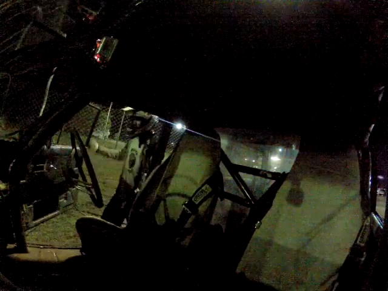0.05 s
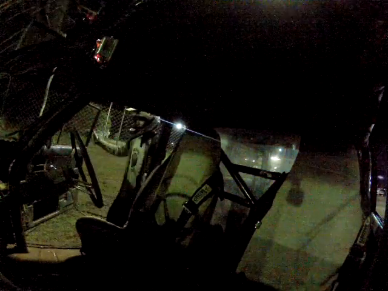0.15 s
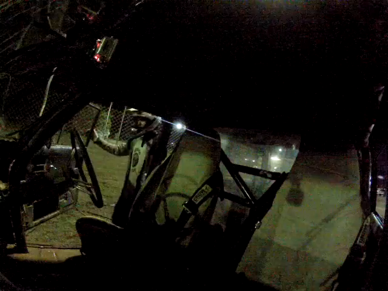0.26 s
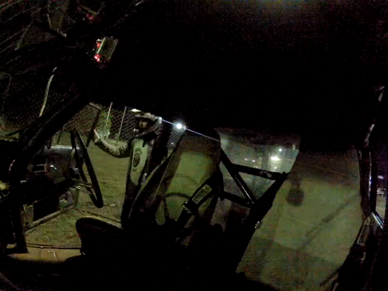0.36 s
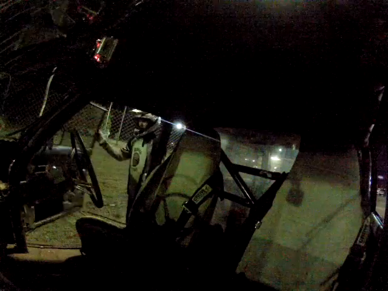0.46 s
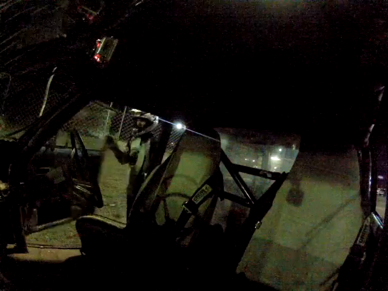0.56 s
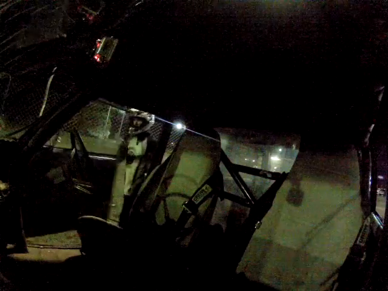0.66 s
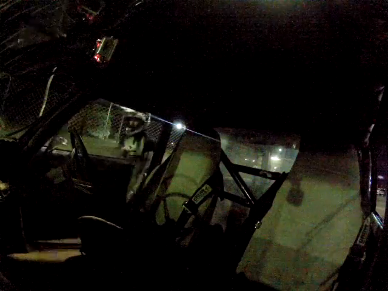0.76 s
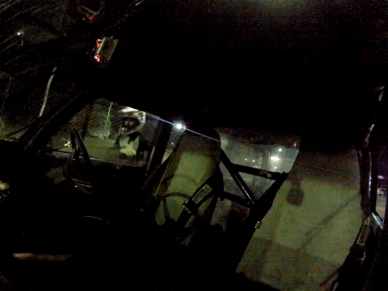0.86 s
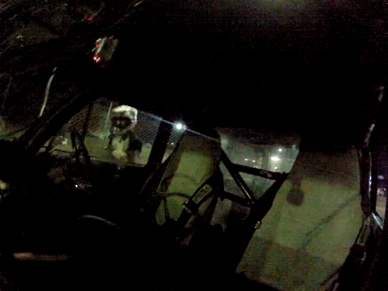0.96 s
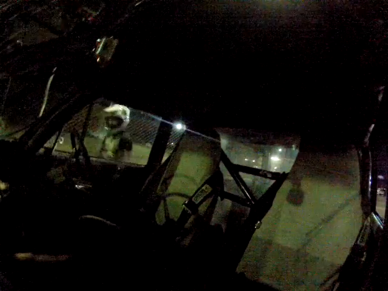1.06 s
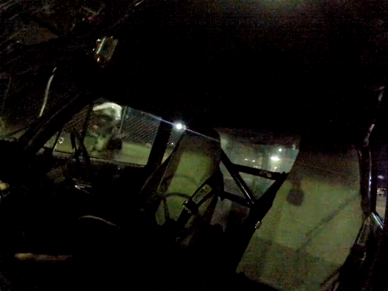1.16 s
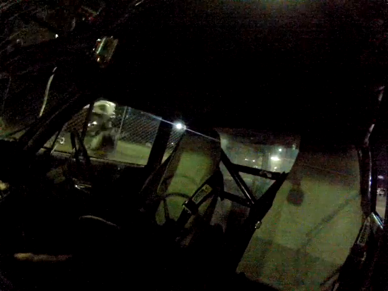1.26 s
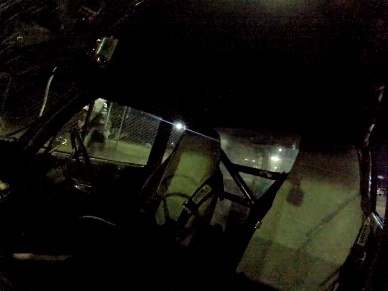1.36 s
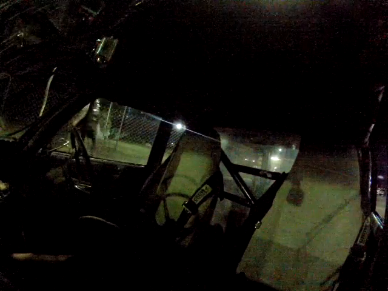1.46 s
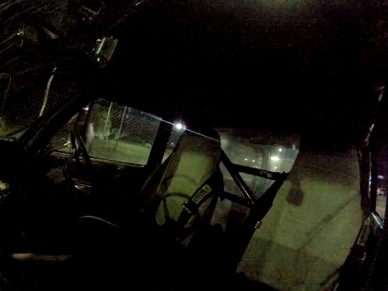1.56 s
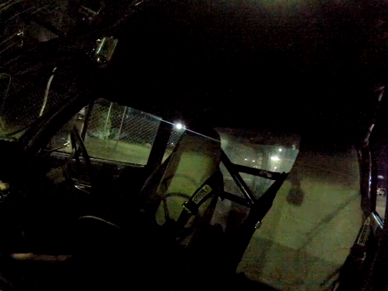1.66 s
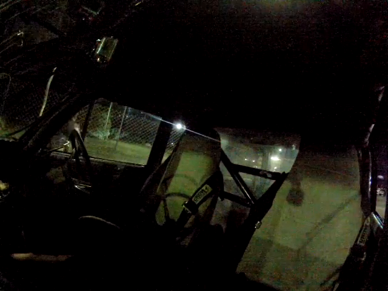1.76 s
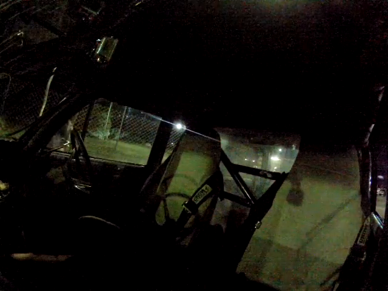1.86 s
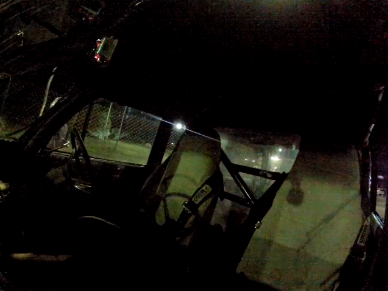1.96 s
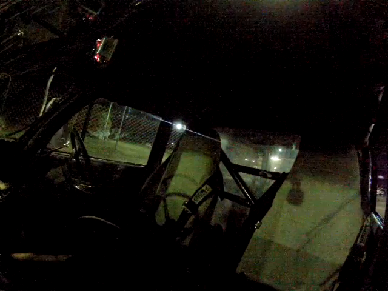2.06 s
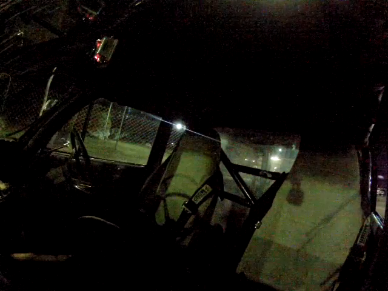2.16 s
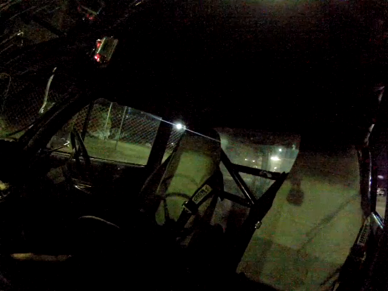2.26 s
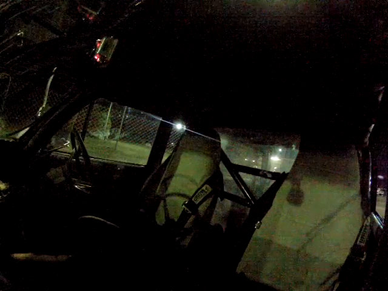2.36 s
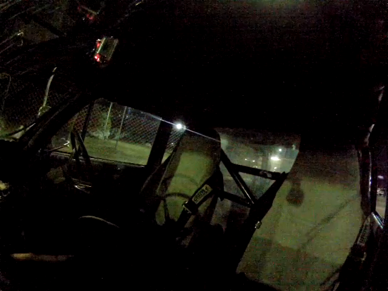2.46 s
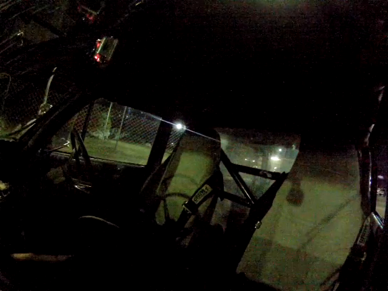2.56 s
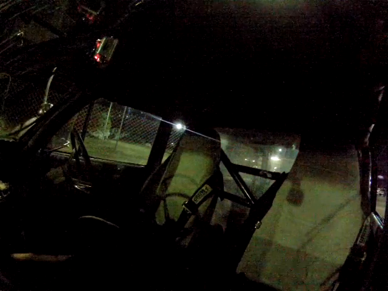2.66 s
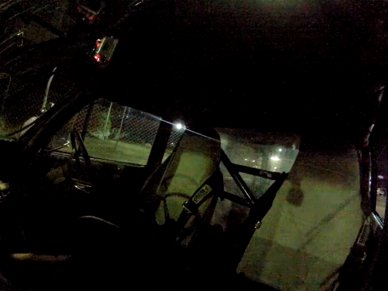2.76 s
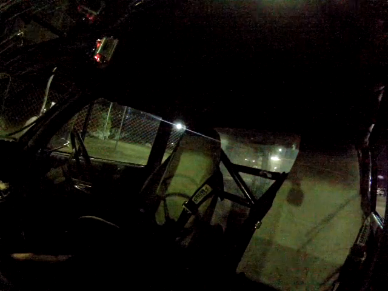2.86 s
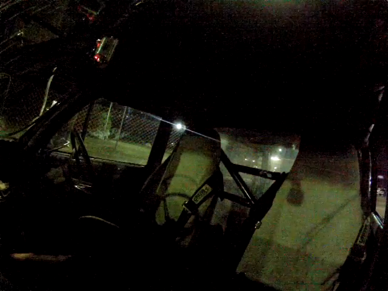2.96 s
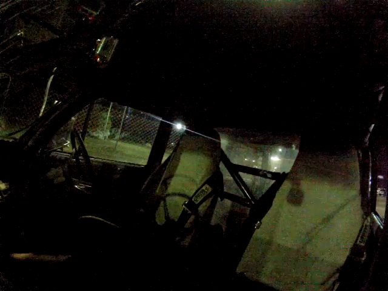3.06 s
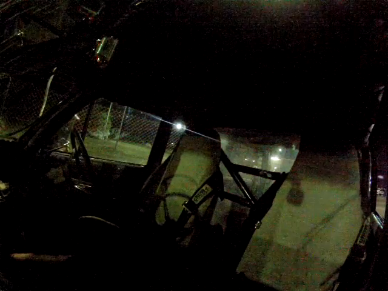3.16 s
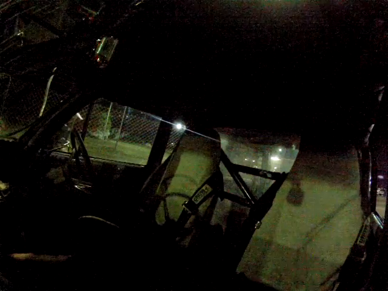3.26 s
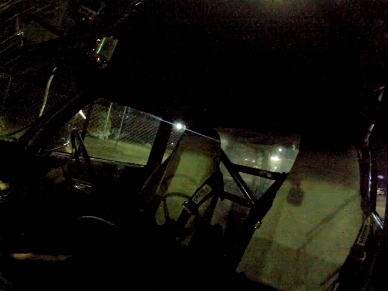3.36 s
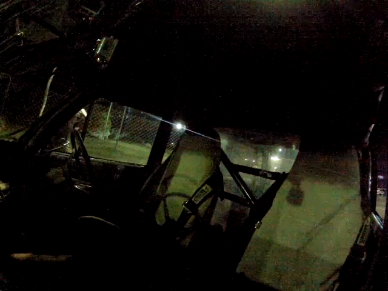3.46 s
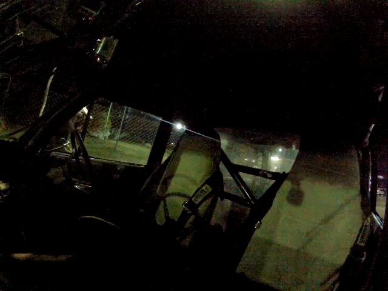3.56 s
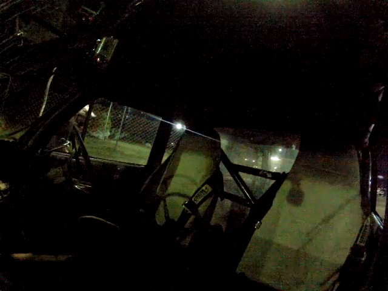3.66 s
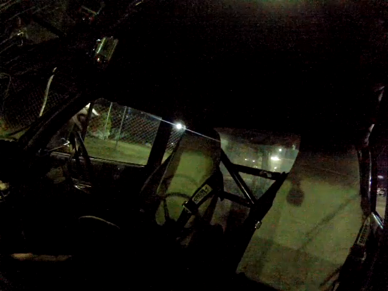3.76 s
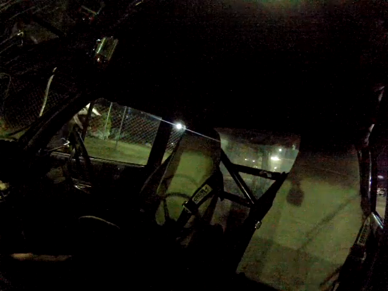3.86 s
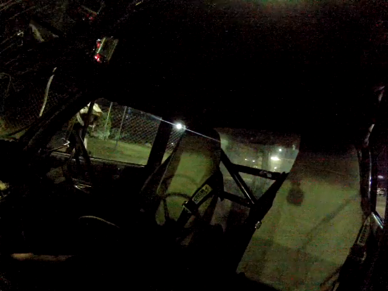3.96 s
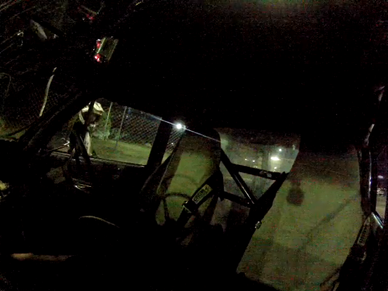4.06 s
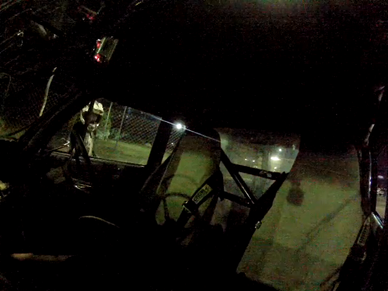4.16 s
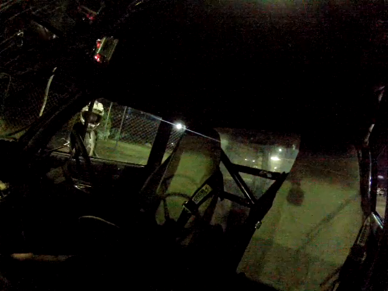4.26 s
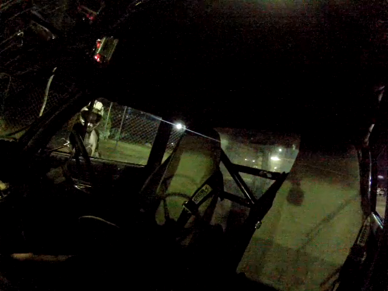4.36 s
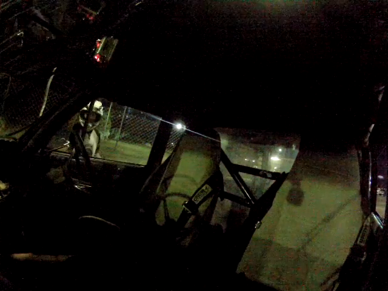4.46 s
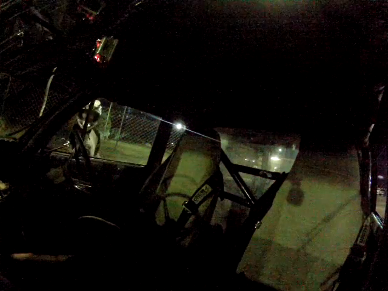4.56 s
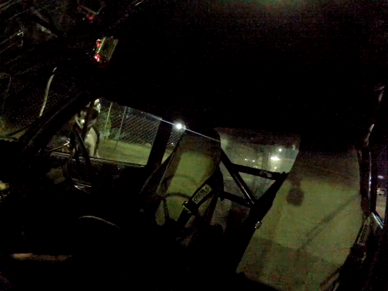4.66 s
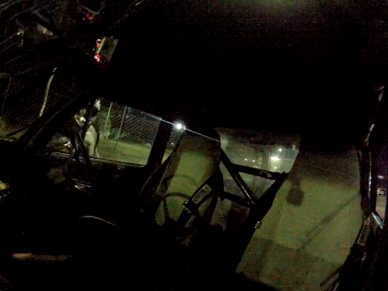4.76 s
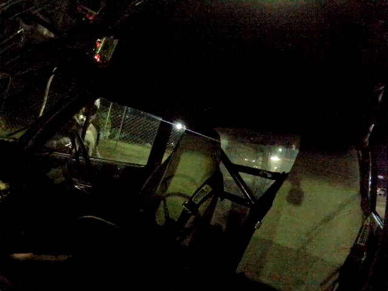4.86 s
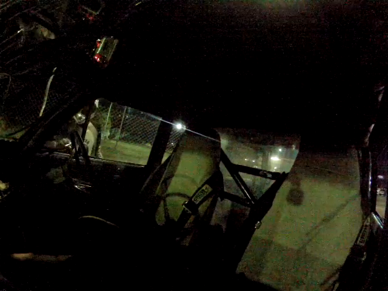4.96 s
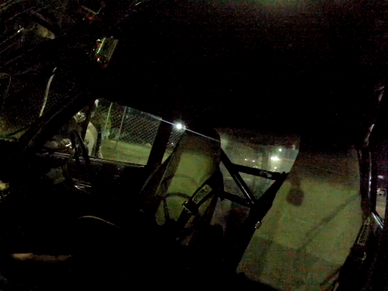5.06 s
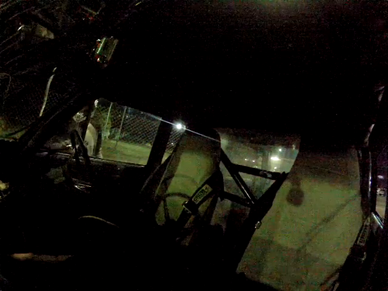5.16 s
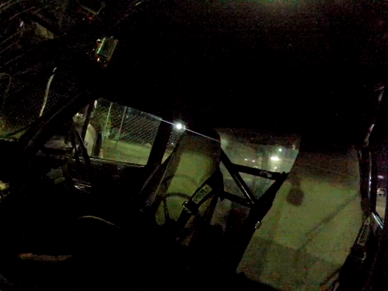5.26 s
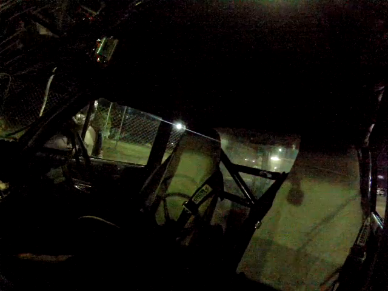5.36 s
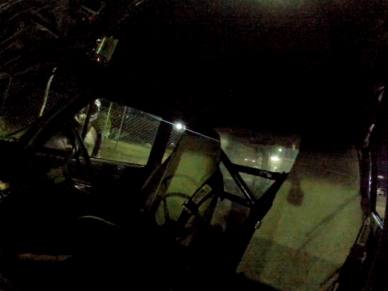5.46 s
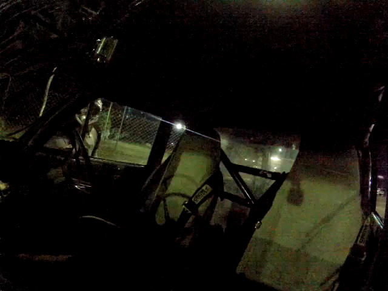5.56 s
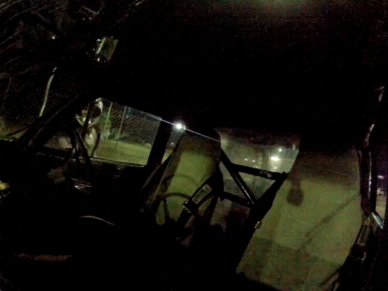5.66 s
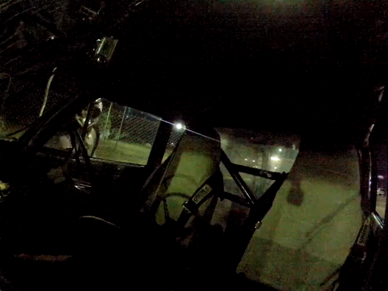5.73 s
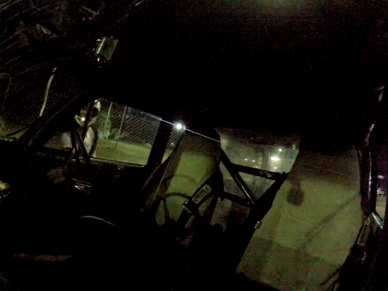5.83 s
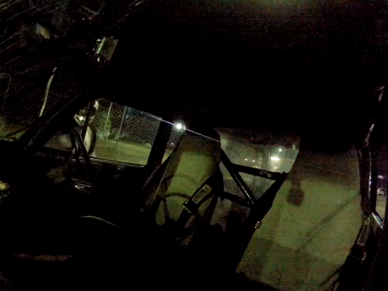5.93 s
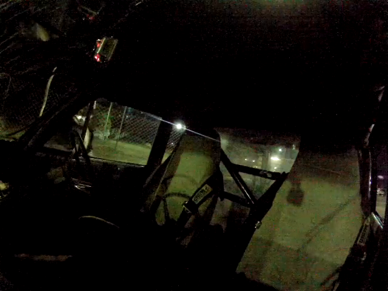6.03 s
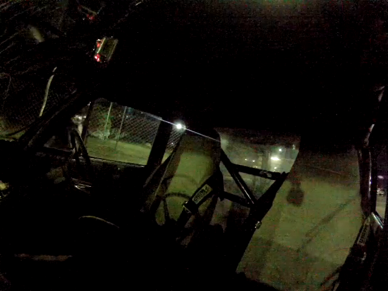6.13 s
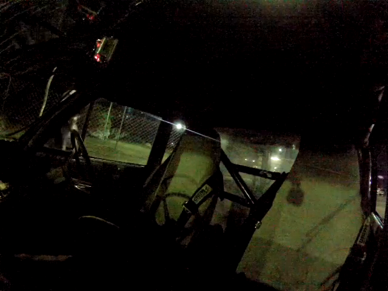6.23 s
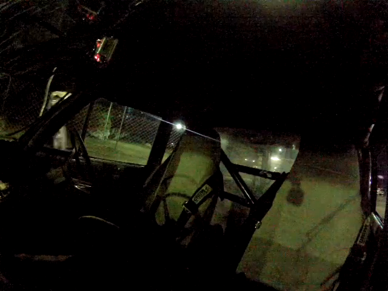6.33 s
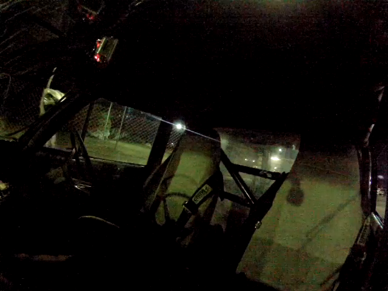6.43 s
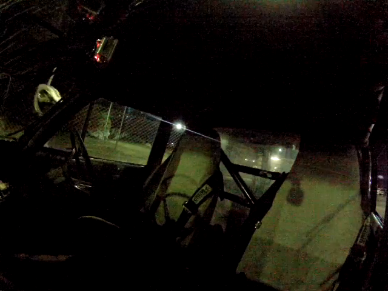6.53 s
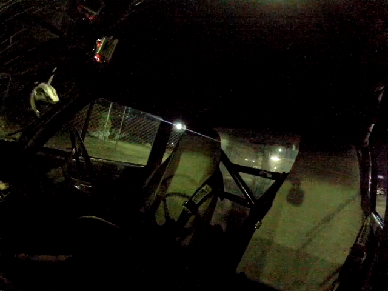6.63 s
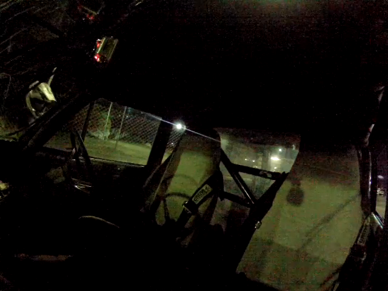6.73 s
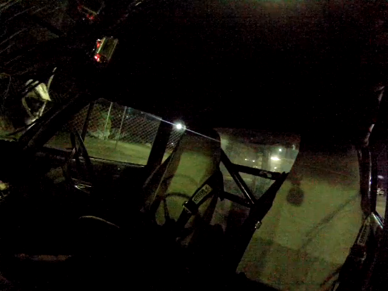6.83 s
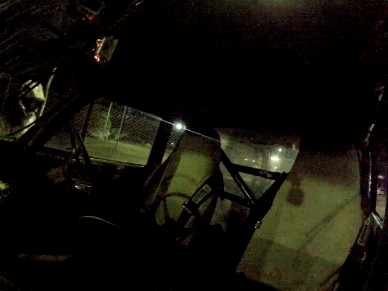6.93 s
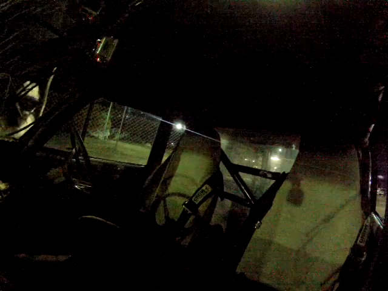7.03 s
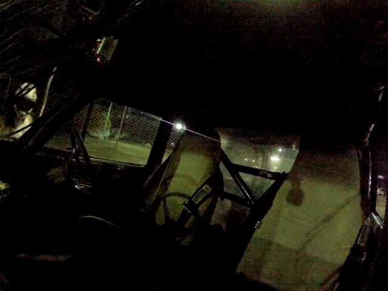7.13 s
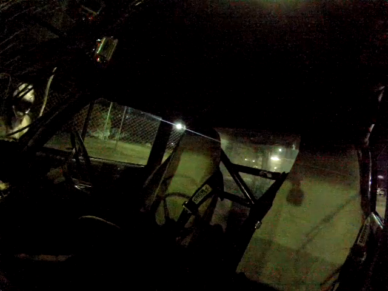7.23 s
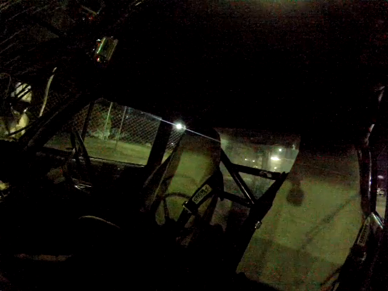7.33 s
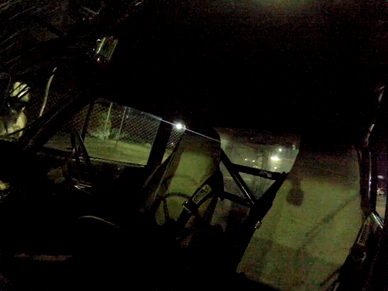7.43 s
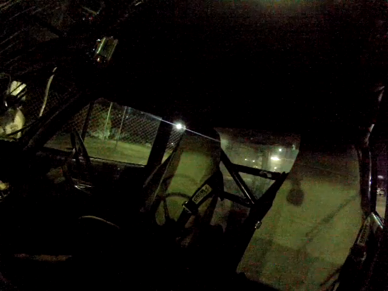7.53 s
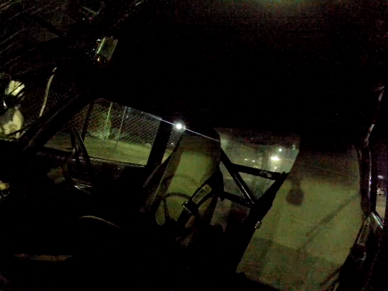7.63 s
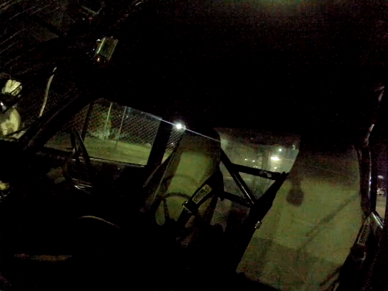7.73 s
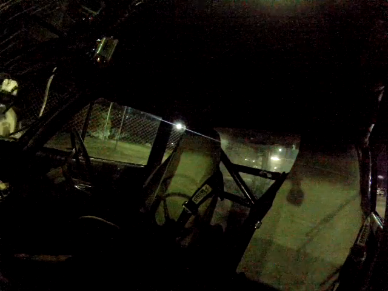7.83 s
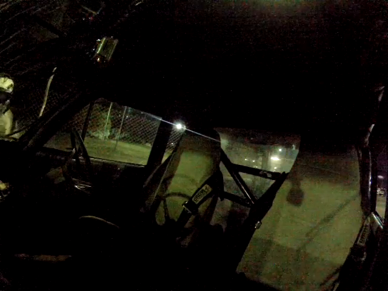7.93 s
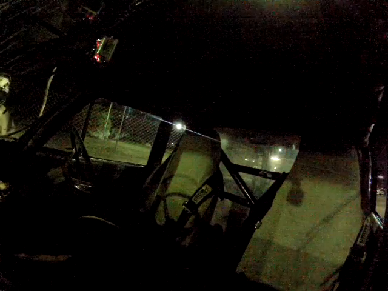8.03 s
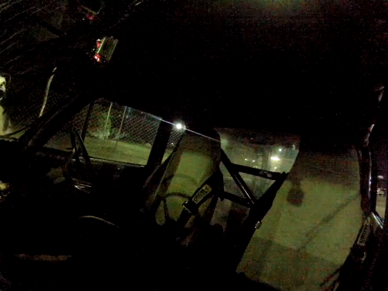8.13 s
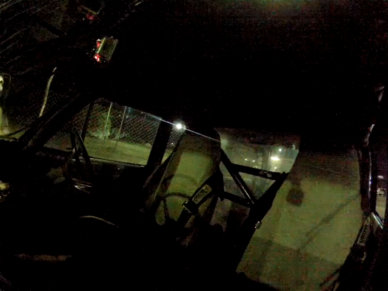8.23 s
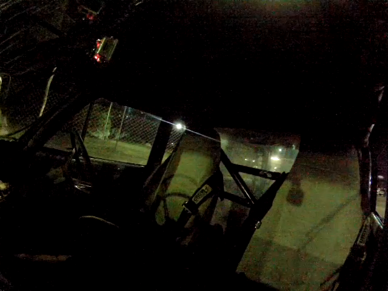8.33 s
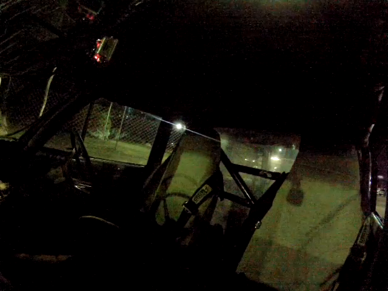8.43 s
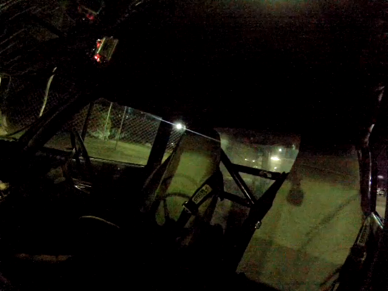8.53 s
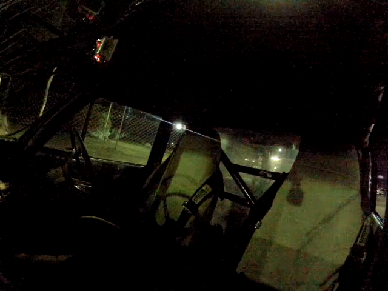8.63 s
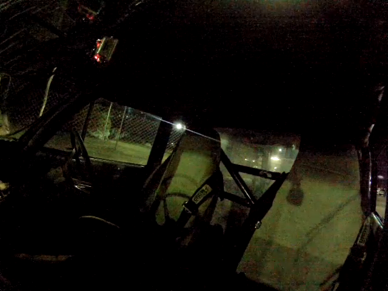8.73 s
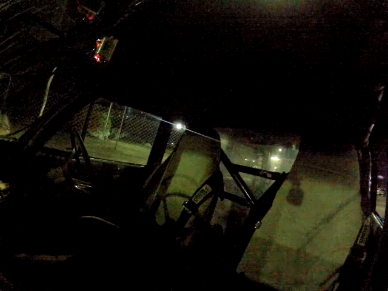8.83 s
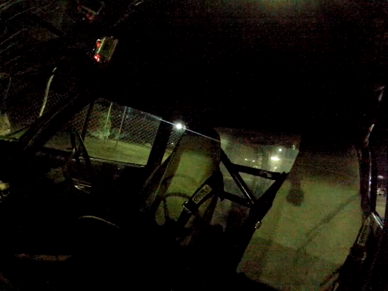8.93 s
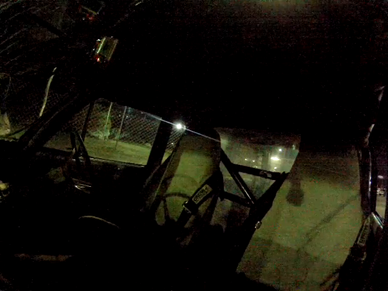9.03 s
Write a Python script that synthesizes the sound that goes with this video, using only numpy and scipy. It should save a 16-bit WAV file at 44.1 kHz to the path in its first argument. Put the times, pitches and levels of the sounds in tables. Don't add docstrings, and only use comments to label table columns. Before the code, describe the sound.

Inside a bare metal car at night, a latch clatters and the door slams with a booming crash; engines idle, rev, and drive off.

```python
import sys
import numpy as np
from scipy import signal
from scipy.fft import rfft, irfft, next_fast_len
from scipy.io import wavfile
from scipy.ndimage import uniform_filter1d

SR = 44100
rng = np.random.default_rng(int(sys.argv[2]) if len(sys.argv) > 2 else 0)


def voltage_ratio(decibels):
    exponent = np.asarray(decibels, float) / 20
    return 10 ** exponent


def transcribe(signal):
    frames = np.atleast_2d(signal).T
    limited = np.clip(frames, -1, 1)
    pcm = np.round(limited * 32767).astype(np.int16)
    wavfile.write(sys.argv[1], SR, pcm)


N = 400869
TIME = np.arange(N) / SR
IDLE_HZ = 26


def slam():
    # pitch_hz [Hz], level_db [dB], t60_s [s]
    shell = [(52.9, -19.2, 1.0), (58.1, -5, 2.4), (72.3, -10, 1.1), (84.8, -2.6, .35), (98.8, -13.3, 2.2),
             (175, -18.2, .41), (190.6, -24.2, 1.2), (251.4, -19.9, .95)]
    # start_s [s], signed force [relative], push_ms [ms]
    blows = [
        (.8699, -.89, 2.2),
        (.8736, 1.48, 14),
        (.911, -.67, 9.5),
        (.9467, -.48, 6.5),
        (.9999, -.65, 12.7),
        (1.0916, -.25, 6.9),
        (1.139, .63, 13.6),
        (1.164, -.68, 13.2),
    ]
    # pitch_hz [Hz], level_db [dB], t60_s [s]
    panels = [(164, -5, 0.68), (222, -4, 1.05), (233.7, -2.5, 0.49), (265.5, -7, 0.8), (335, -12, 0.26),
              (358, -11.5, 0.4), (408, -8, 0.13), (436, -12.5, 0.33), (513, -16.5, 0.4), (616, -24.5, 0)]
    # start_s [s], level_db [dB], thump_db [dB]
    knocks = [(.512, -34.5, -36), (.545, -35, -46), (0.871, -20.5, -60), (.918, -14, -60),
              (0.955, -23, -69), (1.001, -19, -54), (1.04, -28.5, -56), (1.1, -30, -51), (1.2, -45, -43),
              (5.285, -46, -29), (5.852, -53, -51), (8.871, -47, -52)]
    boom = ring(pushes(blows), shell)
    panel_ring = ring(pushes([(s, voltage_ratio(db), 1.2) for s, db, _ in knocks]), panels)
    thump_force = pushes([(s, voltage_ratio(thump_db), 8) for s, _, thump_db in knocks])
    thump = ring(thump_force, [(62.3, 11, 0.13), (72, 5.6, 0.12)])
    settle_s, settle_hz, settle_db, settle_db_per_s = 1.19, 66.9, -21, 21.5
    sway = np.sqrt(2) * np.sin(2 * np.pi * settle_hz * (TIME - settle_s))
    return boom + panel_ring + thump + voltage_ratio(settle_db) * swell(settle_s, .03, settle_db_per_s) * sway


def clicks():
    # pitch_hz [Hz], level_db [dB], t60_s [s]
    skin = [(1016, 0, 0.19), (1288, -5.5, 0.068), (1390, -7.5, .07), (1700, 7, .05), (2100, -13, .07),
            (2170, -10, 0.037), (2220, -11, .09), (2620, -24, 0.18), (2860, 0.5, 0.074), (3870, -11, .08),
            (4062, 1.5, 0.11), (4930, -17, 0.14)]
    # start_s [s], grit_db [dB], tilt_db [dB per band], t60_s [s], ring_db [dB]
    latch_and_crash = [(0.113, -37, -5, 0.1, -40), (0.335, -45, 1, 0.11, -42),
                       (0.381, -51.5, -21, 0.33, -63), (0.426, -53.5, -12, 0.18, -54),
                       (0.513, -29, -5, 0.097, -37), (0.623, -48, -7.5, 0.11, -46.5),
                       (0.715, -51.5, -24.5, 0.38, -66), (0.807, -58, -10, 0.11, -58),
                       (0.83, -43.5, -34, 0.51, -47), (0.864, -26, 1, 0.13, -28),
                       (0.881, -29.5, 2.5, 0.37, -30), (0.948, -26.5, 1.5, 0.2, -32),
                       (0.987, -46, -17, 0.085, -31), (1.039, -52, -6, 0.52, -45.5),
                       (1.093, -38, -3, 0.15, -30), (1.179, -53.5, -2.5, 0.082, -46),
                       (1.109, -46, -8, 0.098, -38.5), (1.236, -54.5, -8, 0.15, -51)]
    # start_s [s], grit_db [dB], tilt_db [dB per band],
    # t60_s [s], ring_db [dB]
    ticks = [
        (1.319, -55, -12, .1, -64),
        (1.4925, -41, -10, .05, -52),
        (1.540, -46, -10, .05, -56),
        (1.74, -57, -12, .15, -62),
        (4.609, -46, -9, .09, -58),
        (5.272, -53, -18, .22, -75),
        (5.849, -55, -1, .075, -54),
        (8.867, -54, -9, .15, -64),
    ]
    # pitch_hz [Hz], level_db [dB per Hz]
    crash = [(180, -17), (300, 11.5), (502, -8), (661, -18.5), (712, -18.5), (1270, -16.5), (1590, -19.5),
             (2020, -8.5), (3630, -15.5), (4220, -14), (6000, -13), (7800, -49), (13200, -120)]
    grit = colour(rng.standard_normal(N) * voltage_ratio(2.0 * walk(300)), crash)
    bands = []
    for edges in [(650, 1400), (1700, 3000), (3000, 5400)]:
        band = signal.sosfilt(signal.butter(2, edges, "band", fs=SR, output="sos"), grit)
        bands.append(band / np.std(band))
    bands = np.array(bands) * np.c_[[1, -1, 1]]
    band_number = np.c_[[0, 1, 2]]
    middle_db = np.c_[[0, 1, 0]]
    fall_rate = np.c_[[.8, 1, 1.3]]
    out, shake = np.zeros(N), np.zeros(N)
    for s, db, tilt_db, t60, ring_db in latch_and_crash + ticks:
        i = int((s - .003) * SR)
        t = TIME[:min(N - i, SR // 2)]
        now = slice(i, i + len(t))
        fall_db = -60 * t / np.clip(t60, .03, .6)
        rise = 1 - np.exp(-t / .0035)
        gain = voltage_ratio(db + tilt_db * band_number + middle_db + fall_rate * fall_db)
        out[now] += rise * np.sum(gain * bands[:, now], axis=0)
        shake[now] += rise * voltage_ratio(ring_db - 32.5 + 2.3 * fall_db)
    return out + ring(shake * rng.standard_normal(N), skin)


def blips():
    # pitch_hz [Hz], level_db [dB per Hz]
    roar_colour = [(240, -33), (400, -23), (433, -7.5), (622, -36), (721, -5), (884, -8.5), (968, -2.5),
                   (1440, -18.5), (1690, -21.5), (1950, -10.5), (2560, -13.5), (2870, -9), (3330, -13.5),
                   (4320, -16), (6000, -18), (7800, -54), (13200, -120)]
    hz, loud, opened = throttle()
    shut_share_db, open_share_db = -8.5, -8.5
    share_db = shut_share_db + (open_share_db - shut_share_db) * opened
    cycle, roar = engine(hz, roar_colour, share_db, firing_db=3, wobble=0.00195)

    hum = tones(cycle, [(2.7, 10), (4, 3.5), (5, 3), (7, -1), (8, -5), (11, -19)])
    gate = np.interp(TIME, [2.05, 2.1, 5.3, 5.4], [0, 1, 1, 0])
    hum_db = -62 + 0.62 * (hz - IDLE_HZ)

    whine = tones(cycle, [(17, -10), (22, -6), (25, -1), (28, -3)])
    gaining = np.clip(np.gradient(hz) * SR / 30, 0, 1)
    pull = gaining * np.clip((hz - 27.5) / 3, 0, 1)
    return voltage_ratio(3.0) * loud * roar + gate * voltage_ratio(hum_db) * hum + voltage_ratio(-61) * pull * whine


def throttle():
    # opens_s [s], shuts_s [s], top_hz [cycles per s], roar_db [dB]
    presses = [
        (2.241, 2.418, 28, -59),
        (2.537, 2.8, 30.5, -57),
        (3.062, 3.72, 42.5, -52.5),
        (4.449, 4.94, 37, -52.5),
    ]
    open_s, build_db, sag_hz_per_s = 0.069, 5.5, 21
    shut_s, shut_db, coast_db_per_s = 0.038, 10, 17.5
    hz, loud, opened = np.full(N, 1. * IDLE_HZ), np.zeros(N), np.zeros(N)
    for opens, shuts, top_hz, db in presses:
        u = np.clip((TIME - opens) / (shuts - opens), 0, 1)
        after = np.maximum(TIME - shuts, 0)
        wound_up = u * u * (3 - 2 * u)
        hz = np.maximum(hz, IDLE_HZ + (top_hz - IDLE_HZ) * wound_up - sag_hz_per_s * after)
        start = np.clip((TIME - opens) / open_s, 0, 1)
        drop = np.minimum(after / shut_s, 1)
        loud += start * voltage_ratio(db - build_db * (1.5 - u) - shut_db * drop - coast_db_per_s * after)
        opened += start * (1 - drop)
    return hz, loud, opened


def leaving():
    # start_s [s], firing_hz [Hz], level_db [dB]
    far_note = [
        (6.1, 138, -60),
        (6.3, 152, -50),
        (6.6, 203, -47),
        (6.9, 222, -52),
        (7.33, 251, -52),
        (7.87, 278, -50),
        (8.0, 271, -51),
        (8.38, 286, -50),
        (8.46, 287, -70),
    ]
    # multiple [ratio], level_db [dB]
    orders = [(2, 0), (2.35, -16), (3, -15), (3.45, -15)]
    # pitch_hz [Hz], level_db [dB per Hz]
    rush_colour = [(240, -27), (400, -3.5), (537, -3), (595, -11), (855, -6), (1100, -0.5), (1200, -7),
                   (1610, -8), (1950, -1), (2340, 0), (2560, -8), (2810, -2), (3370, -10), (3770, -9),
                   (6000, -16.5), (7800, -58), (13200, -120)]
    # start_s [s], rush_db [dB]
    driving = [
        (6.09, -70.5),
        (6.17, -80),
        (6.182, -67),
        (6.41, -61),
        (6.75, -54),
        (7.4, -53.5),
        (7.85, -58.5),
        (8.3, -54.5),
        (8.8, -54),
    ]
    # [repeating share, dB]
    driving_speed = [
        (5.9, 32, -9),
        (6.3, 33.5, -4),
        (6.9, 39, -6),
        (7.75, 44, -6),
        (8.0, 36.2, -3),
        (8.45, 38.4, -1),
        (8.8, 40.1, -1),
        (9.09, 39.4, -1),
    ]
    # start_s [s], added_db [dB relative to the rush], fall_db [dB per s]
    bites = [
        (6.092, 4, 60),
        (6.125, 4, 150),
        (6.179, 4, 150),
    ]

    gate, hz, first_db = curve(far_note)
    upper_db = first_db - 11 - .25 * np.maximum(235 - hz, 0)
    turn = np.cumsum(hz * (1 + .002 * walk(30))) / SR
    note = gate * (voltage_ratio(first_db) * tones(turn, [(1, 0)]) + voltage_ratio(upper_db) * tones(turn, orders))

    _, rush_db = curve(driving)
    _, hz, share_db = curve(driving_speed)
    cycle, rush = engine(hz, rush_colour, share_db, firing_db=7, wobble=.0005)
    _, tyres = engine(hz, rush_colour, -9, firing_db=3, wobble=.002)
    below = signal.butter(2, 1450, fs=SR, output="sos")
    high = rush - signal.sosfiltfilt(below, rush)
    high = high + swell(8.15, .3, 0) * singing(cycle)
    high = high * (1 + sum(voltage_ratio(db) * swell(s, .003, fall_db) for s, db, fall_db in bites))
    low = signal.sosfiltfilt(below, tyres)
    return note + swell(driving[0][0], 0.0051, 0) * voltage_ratio(rush_db + 2.0) * (high + voltage_ratio(-0.5) * low)


def singing(cycle):
    # pitch_hz [Hz], width_hz [Hz], level_db [dB relative to the rush]
    gear_peaks = [(1930, 110, -20), (2320, 110, -11), (2780, 90, -18), (3020, 70, -17), (3880, 90, -22)]
    comb = tones(cycle, [(k, 0) for k in range(44, 104, 2)])
    out = np.zeros(N)
    for hz, width, db in gear_peaks:
        peak = signal.iirpeak(hz, hz / width, fs=SR)
        out += voltage_ratio(db + 3 + 2.2 * walk(7)) * signal.filtfilt(*peak, comb)
    return out


def rumble():
    # pitch_hz [Hz], level_db [dB per Hz]
    boom_colour = [(12, -70), (20, -33), (24, -31.5), (30, -37), (49, 0.5), (65, 5.5), (80, -11),
                   (108, 3.5), (119, -8), (140, -12), (180, -23), (310, -120)]
    # pitch_hz [Hz], level_db [dB per Hz]
    drone_colour = [(65, -25), (110, -4), (157, -10.5), (172, -21), (209, -11), (237, -20), (276, -13),
                    (313, -22), (486, -45), (590, -34.5), (700, -39), (910, -67), (1540, -120)]
    # start_s [s], level_db [dB]
    idling = [(0.0, -40.5), (0.2, -33.5), (0.76, -35.5), (2.0, -34.5), (2.3, -37.5), (2.8, -34),
              (3.0, -37.5), (3.4, -34.5), (4.2, -42), (4.7, -37.5), (5.3, -36), (6.1, -41.5), (6.5, -38),
              (6.95, -41.5), (7.3, -38.5), (8.5, -41.5), (9.09, -46.5)]
    # peak_s [s], length_s [s], swell_db [dB]
    revs = [
        (3.402, .35, 6),
        (4.699, 0.23, 7),
        (6.503, 0.11, 7),
        (7.307, 0.39, 5),
        (8.488, 0.55, 11.5),
    ]
    # peak_s [s], level_db [dB], fall_db [dB per s]
    shudder = [
        (0.949, -15.5, 55),
        (1.03, -21.5, 56),
    ]
    boom_shake, drone_shake = [voltage_ratio(db) * swell(s, .07, fall_db) for s, db, fall_db in shudder]
    revs_db = sum(db * np.exp(-((TIME - s) / length) ** 2 * 2) for s, length, db in revs)
    boom = colour(rng.standard_normal(N), boom_colour)
    drone = restless(drone_colour, 1.67, 6.9)
    _, idling_db = curve(idling)
    return (voltage_ratio(idling_db) + boom_shake) * boom + (voltage_ratio(-47.5 + revs_db) + drone_shake) * drone


def night_air():
    # pitch_hz [Hz], level_db [dB per Hz]
    night = [(240, -15), (400, 1), (549, -3), (581, -21), (651, -4.5), (990, -6.5), (1020, -5),
             (1110, -7.5), (1460, -13), (1930, -8.5), (2560, -11.5), (2970, -12), (3220, -13), (4370, -15),
             (6000, -20), (7800, -61), (13200, -120)]
    return voltage_ratio(-63.5) * restless(night, 1.0, 13)


def cabin(x):
    # pitch_hz [Hz], width_hz [Hz], lift_db [dB]
    case = [(988, 24, 5), (1119, 13, 7.5), (1943, 64, 7.5), (2306, 14, 5.5), (2770, 26, 6.5), (2937, 20, 8),
            (4270, 27, 4.5)]
    out = x
    for hz, width, db in case:
        out = out + (voltage_ratio(db) - 1) * signal.lfilter(*signal.iirpeak(hz, hz / width, fs=SR), x)
    return out


def engine(hz, spectrum, share_db, firing_db, wobble):
    cycle = np.cumsum(hz * (1 + wobble * walk(20))) / SR
    place = np.arange(512) / 512
    puffs = rfft(np.exp(-(4 * place % 1) / 0.88) * rng.standard_normal(512))
    order = np.arange(len(puffs))
    order_db = firing_db * ((order % 2 == 0) / 2 + (order % 4 == 0) / 2)
    order_db = order_db + 2.0 * rng.standard_normal(len(order))
    pattern = irfft(puffs / abs(puffs) * voltage_ratio(order_db))
    firing = colour(np.interp(cycle % 1, place, pattern, period=1), spectrum)
    gas = (1 + 0.084 * np.cos(8 * np.pi * cycle)) * restless(spectrum, 0.7, 16)
    share = np.clip(voltage_ratio(share_db), 0, 1)
    return cycle, share * firing + np.sqrt(1 - share ** 2) * gas


def tones(cycle, orders):
    out = np.zeros(N)
    for k, db in orders:
        out += voltage_ratio(db + 1.8 * walk(8)) * np.sqrt(2) * np.sin(2 * np.pi * k * cycle)
    return out


def pushes(rows):
    force = np.zeros(N)
    for s, size, ms in rows:
        push = np.hanning(int(ms * SR / 1000) + 2)
        i = int(s * SR)
        force[i:i + len(push)] += size * push / push.sum()
    return force


def ring(x, modes):
    out = np.zeros(N)
    for hz, db, t60 in modes:
        pole = np.exp((2j * np.pi * hz - np.log(1000) / np.maximum(t60, 1e-9)) / SR)
        out += voltage_ratio(db) * signal.lfilter([1], [1, -pole], x).imag
    return out


def swell(s, rise_s, fall_db):
    rise = np.clip(1 + (TIME - s) / rise_s, 0, 1) ** 2
    return rise * voltage_ratio(-fall_db * np.maximum(TIME - s, 0))


def curve(table):
    s, *columns = np.transpose(table)
    gate = np.interp(TIME, [s[0] - .05, s[0], s[-1], s[-1] + .1], [0, 1, 1, 0])
    return [gate] + [np.interp(TIME, s, c) for c in columns]


def restless(spectrum, flicker_db, rate):
    x = colour(rng.standard_normal(N), spectrum)
    lows = [0]
    for edge in 375 * 2. ** np.arange(5):
        lows.append(signal.sosfiltfilt(signal.butter(2, edge, fs=SR, output="sos"), x))
    lows.append(x)
    return sum((b - a) * voltage_ratio(flicker_db * walk(rate)) for a, b in zip(lows, lows[1:]))


def colour(x, spectrum):
    size = next_fast_len(N)
    hz, db = np.transpose(spectrum)
    octave = np.log2(np.arange(size // 2 + 1) * SR / size + 1)
    beyond = np.maximum(np.log2(hz[0]) - octave, 0) + np.maximum(octave - np.log2(hz[-1]), 0)
    gain = voltage_ratio(np.interp(octave, np.log2(hz), db) - 30 * beyond)
    y = irfft(rfft(x, size) * gain, size)[:N]
    return y / np.std(y)


def walk(rate):
    k = int(SR / rate)
    steps = np.repeat(rng.standard_normal(N // k + 1), k)
    w = uniform_filter1d(uniform_filter1d(steps, k), k)[:N]
    return w / np.std(w)


def scene():
    mono = slam() + rumble() + cabin(clicks() + blips() + leaving() + night_air())
    return np.array([mono, mono])


def top_cut(x):
    return signal.sosfilt(signal.butter(12, 15690, fs=SR, output="sos"), x)


def record(dry):
    mic = signal.sosfilt(signal.butter(2, 32, "high", fs=SR, output="sos"), dry)
    slow = np.clip(signal.resample_poly(mic, 40, 147, axis=1), -1, 1)
    held = np.repeat(slow, 4, axis=1)
    back = signal.resample_poly(held, 147, 160, axis=1)[:, :N]
    strain = uniform_filter1d(back[0] ** 2, size=2000)
    unsteady = voltage_ratio(-24) * strain * walk(210) * back[0]
    hiss = voltage_ratio(-77.5) * signal.lfilter(*signal.butter(2, 5000, fs=SR), rng.standard_normal(N))
    back = signal.sosfiltfilt(signal.butter(12, 15500, fs=SR, output="sos"), back)
    mix = np.clip(back + (unsteady + hiss) * np.c_[[1, -1]], -1, 1)
    return top_cut(mix)


dry = scene()
out = record(dry)
transcribe(out)
```